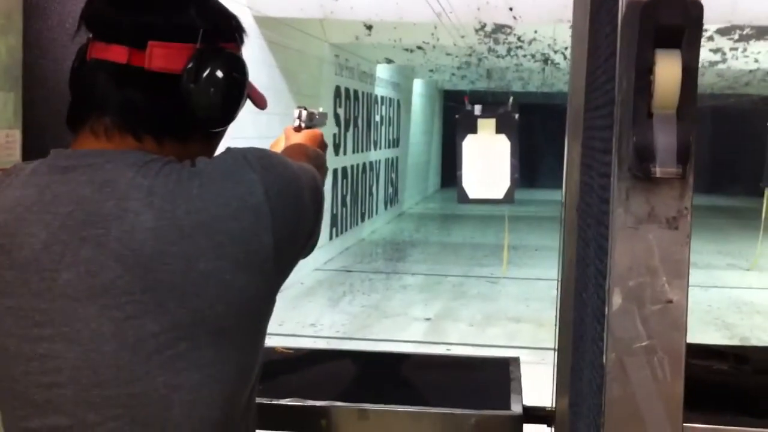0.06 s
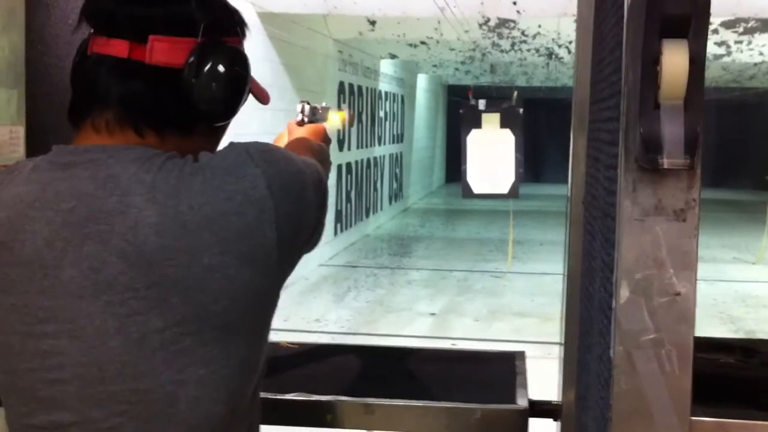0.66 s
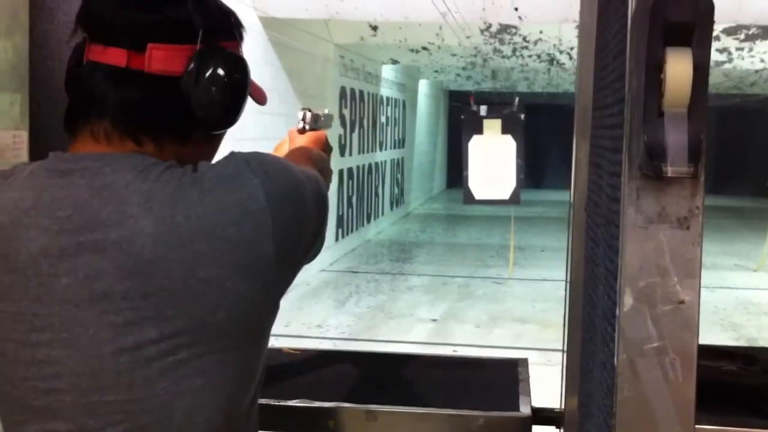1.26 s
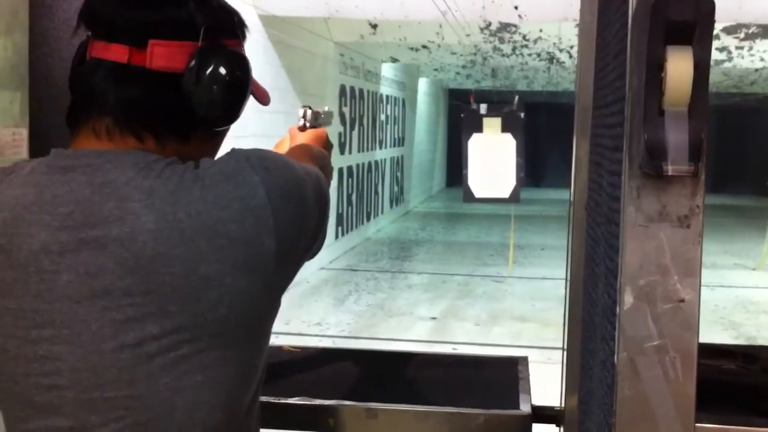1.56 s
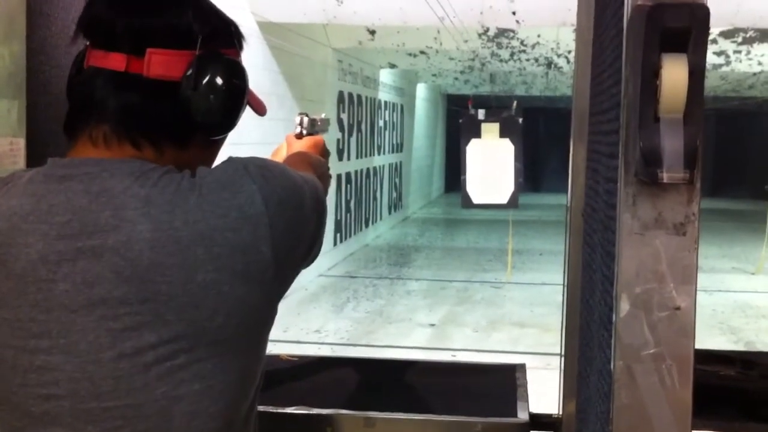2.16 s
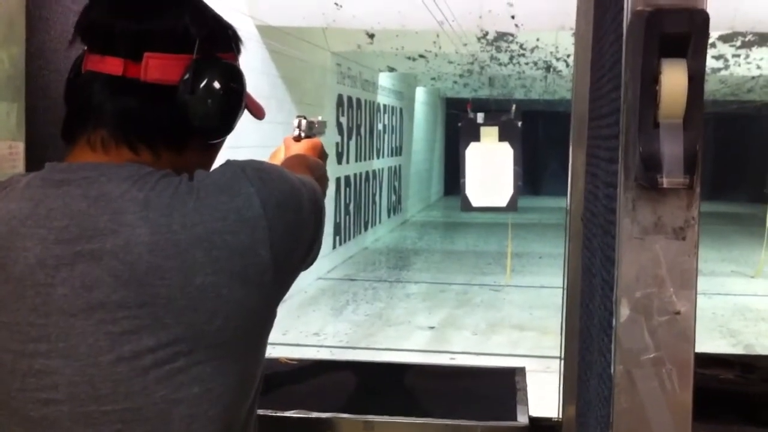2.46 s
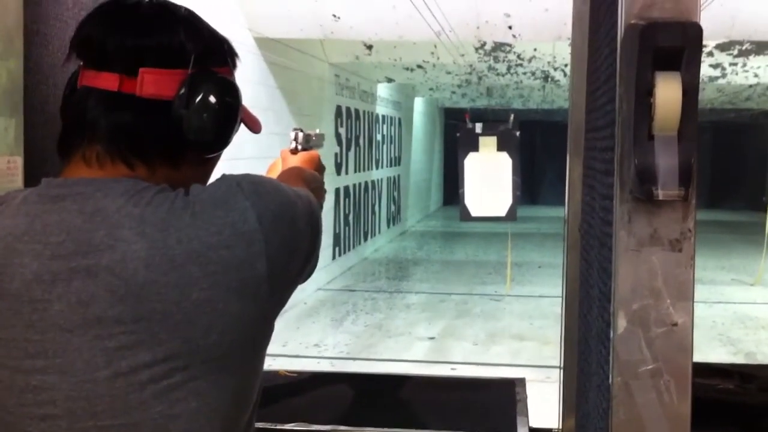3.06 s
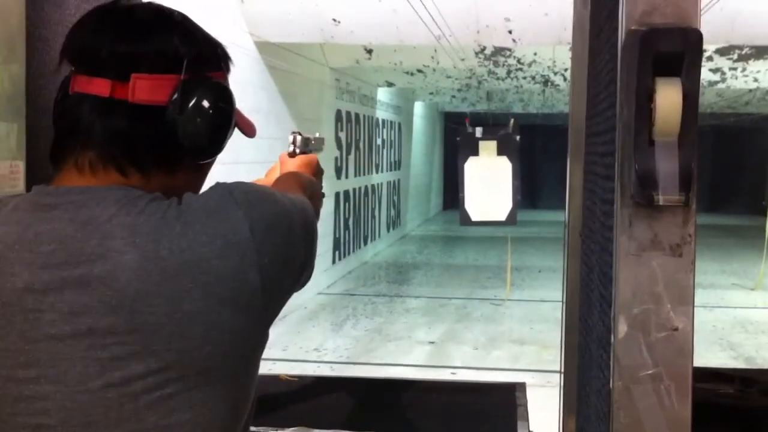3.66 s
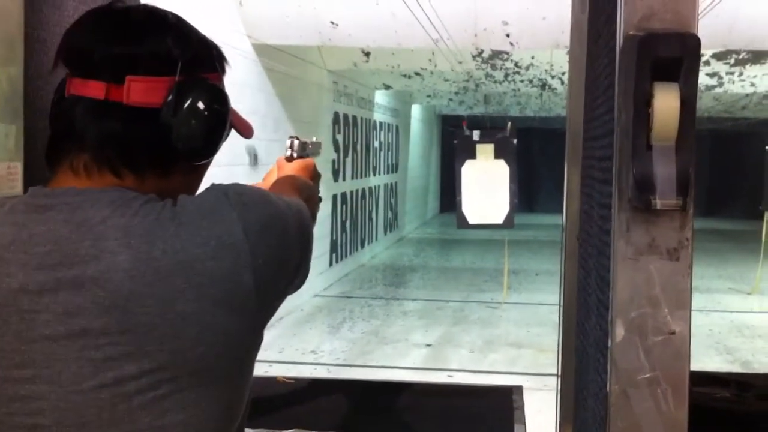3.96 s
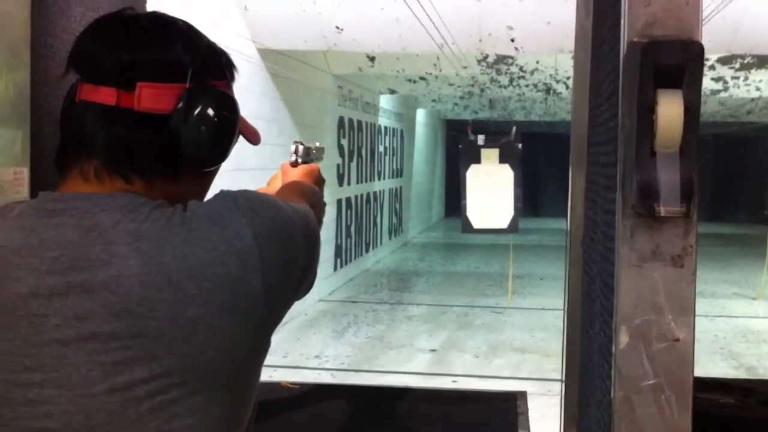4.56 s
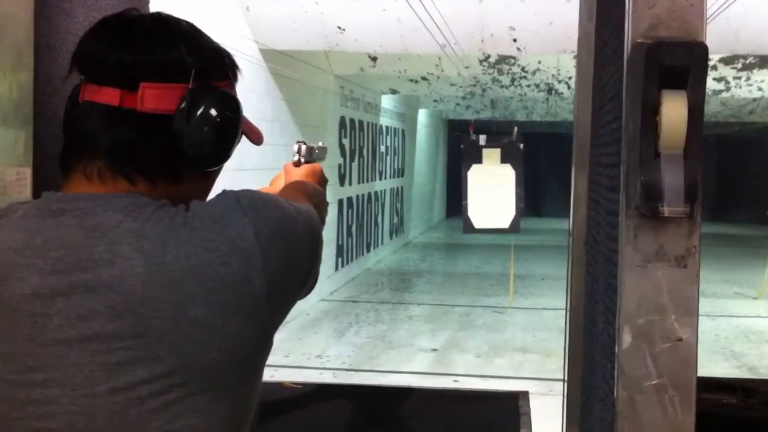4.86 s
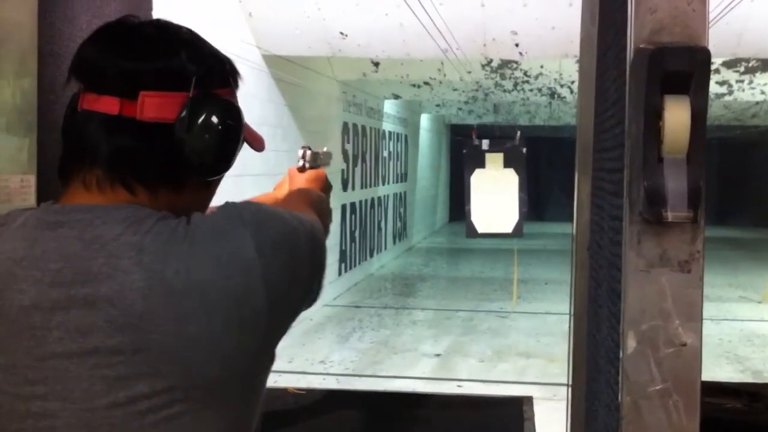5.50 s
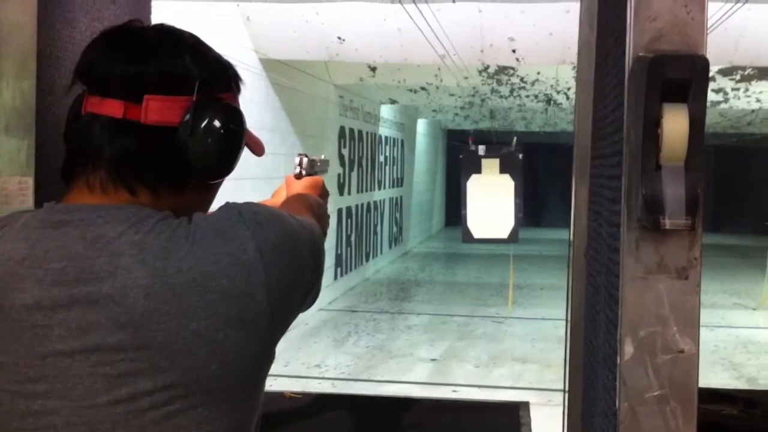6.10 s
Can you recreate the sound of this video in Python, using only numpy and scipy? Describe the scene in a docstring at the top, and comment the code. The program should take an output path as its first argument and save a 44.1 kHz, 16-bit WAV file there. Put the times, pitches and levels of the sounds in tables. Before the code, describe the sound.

Steady ventilation rumble and air hiss fill an indoor shooting range, heard from just behind the booth. At about 0.8 seconds a pistol fires: a sharp crack and boom rattles between the booth walls, slaps back from the far end and rolls on through the concrete hall. A brief, bright rustle comes at about 1.6 seconds, followed by faint, high pings of spent brass and two light ticks up to 3 seconds. Two quick shots land at about 3.4 and 3.6 seconds. A knock follows near 3.9, then a sharp metallic knock with a louder ping at 4.5, and smaller clinks around 5 and 5.3. Two more shots come at about 5.4 and 5.7 seconds, their echo dying away. Each blast overloads the microphone, and the overall level dips and slowly recovers.

```python
"""Five pistol shots in an indoor range, heard from just behind the shooter's booth.
Ventilation runs from start to end. The first shot, at 0.8 s, rattles between the booth walls, comes
back from the far end and rolls on in the concrete hall. A brief rustle and faint pings of spent brass
cases follow. Two quick shots come at about 3.5 s, then louder pings and knocks, and two more shots at
about 5.5 s. Each blast overloads the recorder, which turns itself down and slowly back up."""
import sys
import numpy as np
from scipy import signal
from scipy.fft import rfft, irfft, next_fast_len
from scipy.io import wavfile
from scipy.ndimage import uniform_filter1d

SR = 44100
rng = np.random.default_rng(int(sys.argv[2]) if len(sys.argv) > 2 else 0)


def master_out(mix):
    """Clip the mix to full scale and print it as 16-bit PCM to the path in sys.argv[1]."""
    frames = np.transpose(np.atleast_2d(mix))
    ceiling = np.clip(frames, -1, 1)
    pcm = np.round(ceiling * 32767).astype(np.int16)
    wavfile.write(sys.argv[1], SR, pcm)


N = 279594
TIME = np.arange(N) / SR


def gain_of(db):
    return 10 ** (np.asarray(db) / 20)


def unit_level(x):
    """Scales x to an average power of 1."""
    return x / np.sqrt(np.mean(x ** 2) + 1e-20)


def look_up(table, hz):
    """The value between a table's rows, on a log-frequency axis."""
    f, value = np.transpose(table)
    return np.interp(np.log(hz + 1), np.log(f + 1), value)


def add(mix, start_s, sound):
    """Adds a sound into the mix at its start time."""
    part = mix[round(start_s * SR):][:len(sound)]
    part += sound[:len(part)]


def tint(x, colour):
    """Makes each frequency of x louder or softer by a table of dB."""
    size = next_fast_len(len(x))
    gains = gain_of(look_up(colour, np.fft.rfftfreq(size, 1 / SR)))
    return irfft(rfft(x, size) * gains, size)[:len(x)]


def noise(colour, size):
    """Noise of power 1; the colour says how strong its frequencies are next to each other."""
    return unit_level(tint(rng.standard_normal(size), colour))


def dying(t, t60):
    """A smooth decay; t60 is the time it takes to fall by 60 dB."""
    return np.exp(-np.log(1000) * t / t60)


def fade(x, t60s, build_cycles=1):
    """Each frequency of x takes some cycles to build up, then dies at its own speed."""
    hz, t, spectrum = signal.stft(x, SR, nperseg=512)
    build = 1 - np.exp(-(t + t[1] / 2) * hz[:, None] / build_cycles)
    decay = gain_of(-60 * t / look_up(t60s, hz)[:, None])
    return signal.istft(spectrum * build * decay, SR, nperseg=512)[1][:len(x)]


def ring(tones, t):
    """A struck object rings with a few dying tones, each starting at a random point in its cycle."""
    return sum(gain_of(db) * dying(t, t60) * np.sin(2 * np.pi * (hz * t + rng.random()))
               for hz, db, t60 in tones)


def ventilation(level_db=-39.5):
    """Steady duct rumble and air hiss."""
    # colour of the moving air: f/Hz, level/dB
    air_colour = [(15, -67), (25, -31), (70, -26), (116, -4.5), (157, -2), (352, -8.5), (403, -18),
                  (587, -15.5), (769, -18.5), (981, -18.5), (1430, -21.5), (1640, -21.5), (2520, -23),
                  (3680, -23), (15800, -31.5)]
    return gain_of(level_db) * noise(air_colour, N)


def rustle(rise_s=0.022, t60=0.44):
    """Short, bright brushes of noise that swell quickly, then die away."""
    # one row a brush: t/s, level/dB
    brushes = [(1.603, -29.5), (1.672, -27.5)]
    # colour of a brush: f/Hz, level/dB
    brush_colour = [(100, -45), (800, -17), (3000, -5), (6000, -1), (10000, -5), (15000, -8)]
    t, out = TIME[:SR], np.zeros(N)
    stroke = np.minimum(t / rise_s, dying(t - rise_s, t60))
    for start_s, db in brushes:
        add(out, start_s, gain_of(db) * stroke * noise(brush_colour, SR))
    return out


def brass_pings(tumble=0.4):
    """Spent cases land and ring; they send the sound out unevenly as they tumble."""
    # one row a landing: t/s, level/dB
    landings = [(1.83, -52), (2.08, -54), (2.31, -58.5), (2.585, -55), (4.533, -28), (5.0, -42),
                (5.268, -36), (5.315, -36.5)]
    # tones of a brass case: f/Hz, level/dB, t60/s
    case_tones = [(7810, -3, 0.39), (7920, 1.5, 0.54), (7985, -9, 0.23), (11800, -4.5, 0.29),
                  (12080, -16, 0.16)]
    out = np.zeros(N)
    for start_s, db in landings:
        wobble = 1 + tumble * unit_level(uniform_filter1d(rng.standard_normal(SR), size=350))
        add(out, start_s, gain_of(db) * wobble * ring(case_tones, TIME[:SR]))
    return out


def knocks(click_t60=0.11):
    """Each knock is a click of noise plus the short, deeper ring of a struck brass case."""
    # one row a knock: t/s, click level/dB, ring level/dB
    hits = [(2.782, -43.5, -65), (3.033, -39, -54), (3.945, -12, -41), (4.531, -16, -8), (5.0, -36, -55),
            (5.268, -38, -51.5)]
    # colour of a click: f/Hz, level/dB
    click_colour = [(30, -30), (200, -14), (1500, 2), (5500, 0), (10000, -3), (15000, -4)]
    # tones of a struck case: f/Hz, level/dB, t60/s
    struck_case_tones = [(1800, -4.5, 0.069), (3110, -6.5, 0.046), (4540, -17, .08), (5550, -3.5, 0.051),
                         (7840, -10, 0.044), (9044, -16, 0.11)]
    t, out = TIME[:SR], np.zeros(N)
    for start_s, click_db, ring_db in hits:
        click = gain_of(click_db) * noise(click_colour, SR) * dying(t, click_t60)
        add(out, start_s, click + gain_of(ring_db) * ring(struck_case_tones, t))
    return out


def with_reflections(x, level_db=-8, t60=0.3):
    """The booth adds a short spray of reflections to a small sound."""
    room = rng.standard_normal(SR) * dying(TIME[:SR], t60)
    return x + gain_of(level_db) * signal.fftconvolve(x, room / np.linalg.norm(room))[:N]


def wall_flutter(size):
    """Sound trapped between parallel walls lingers in a nearly even row of pitches."""
    # resonances between the walls: f/Hz, width/Hz, level/dB
    peaks = [(397, 114, -4.5), (592, 55, -3), (767, 116, 0.5), (1120, 134, -3), (1438, 94, -5),
             (1805, 190, -11), (2150, 120, -8.5), (2480, 130, -9), (2840, 140, -15.5), (3600, 560, -18),
             (5000, 1440, -20.5)]
    # how long they linger: f/Hz, t60/s
    flutter_decay = [(380, 2.3), (750, 2.47), (1400, 2.364), (3000, 2.17), (5500, 1.72)]
    hz = np.fft.rfftfreq(size, 1 / SR)
    shape = sum(gain_of(db) * np.exp(-((hz - centre) / width) ** 2) for centre, width, db in peaks)
    trapped = unit_level(irfft(rfft(rng.standard_normal(size)) * shape, size))
    return fade(trapped, flutter_decay)


def hall_roll(hall_noise, hall_db=19, flutter_db=2, swell_s=0.052):
    """A blast swells up in the concrete hall and rolls on, along with the wall flutter."""
    # how long the hall rings: f/Hz, t60/s
    hall_decay = [(120, 0.94), (350, 1.35), (750, 1.343), (1400, 1.49), (2700, 1.35), (5500, 1.172),
                  (9500, 0.8), (14000, 0.34)]
    size = len(hall_noise)
    swell = 1 - np.exp(-TIME[:size] / swell_s)
    tail = gain_of(hall_db) * fade(hall_noise, hall_decay, build_cycles=2.8)
    return swell * (tail + gain_of(flutter_db) * wall_flutter(size))


def far_wall_echo(booth_noise, slap_db=6, slap_t60=0.022, smear_db=13.5, rise_s=0.0047):
    """The straight path to the far wall returns a slap; slanted paths crowd in behind as a smear."""
    # colour of the smear: f/Hz, level/dB
    smear_colour = [(30, -55), (90, -11.5), (200, 6), (700, 2.5), (1200, 2.5), (2000, -4.5), (5000, -4.5),
                    (8000, -12), (15000, -20)]
    # how long it lasts: f/Hz, t60/s
    smear_decay = [(200, 0.34), (800, 0.77), (3000, 0.51), (12000, 0.48)]
    t = TIME[:SR]
    slap = booth_noise * dying(t, slap_t60)
    smear = fade(noise(smear_colour, SR), smear_decay) * (1 - np.exp(-t / rise_s))
    return gain_of(slap_db) * slap + gain_of(smear_db) * smear


def booth_blast(booth_noise, level_db=29):
    """The blast rattles between the booth walls: a thin crack first, then the boom."""
    # how long the booth rings: f/Hz, t60/s
    booth_decay = [(200, 0.43), (1200, 0.25), (5000, 0.27), (15000, 0.17)]
    return gain_of(level_db) * fade(booth_noise, booth_decay, build_cycles=17.5)


def pistol_shots(echo_delay_s=0.139, alike=0.6):
    """Each shot gives a blast in the booth, a long roll in the hall and one echo."""
    # one row a shot: t/s, blast gain/dB, hall gain/dB, echo gain/dB
    shots = [(0.809, 0.5, -1, 2.5), (3.3562, 1, -2, 2.5), (3.617, -3, 0.5, -1.5), (5.3927, 1, -0.5, 2),
             (5.674, -2, 0, -1)]
    # colour of the blast in the booth: f/Hz, level/dB
    booth_colour = [(40, -38), (150, -6.5), (400, -1), (900, 4), (1500, 3.5), (2500, -2), (5000, -2.5),
                    (8000, -5), (12000, -10), (16000, -2.5)]
    # colour of the hall: f/Hz, level/dB
    hall_colour = [(35, -67), (100, -26), (170, 0), (300, 2.5), (520, 2.5), (700, 4), (950, -3), (1200, -3),
                   (1700, -13), (2500, -10), (3600, -15.5), (5500, -16), (9000, -17), (15000, -8)]
    hall_size, out = 3 * SR, np.zeros(N)
    # the same walls answer every shot in nearly the same way, so the shots share part of their noise
    booth_walls, hall_walls = noise(booth_colour, SR), noise(hall_colour, hall_size)
    shared, fresh = np.sqrt(alike), np.sqrt(1 - alike)
    for start_s, blast_db, hall_db, echo_db in shots:
        booth_noise = shared * booth_walls + fresh * noise(booth_colour, SR)
        hall_noise = shared * hall_walls + fresh * noise(hall_colour, hall_size)
        add(out, start_s, gain_of(blast_db) * booth_blast(booth_noise))
        add(out, start_s, gain_of(hall_db) * hall_roll(hall_noise))
        add(out, start_s + echo_delay_s, gain_of(echo_db) * far_wall_echo(booth_noise))
    return out


def scene():
    """All the sounds of the range in one channel."""
    return (pistol_shots() + with_reflections(brass_pings() + knocks()) + rustle() + ventilation())[None]


def duck(x, threshold_db=-9, max_cut_db=20, attack_s=0.0016, release_s=0.66):
    """Automatic volume control: turns loud sound down quickly, then creeps back up."""
    power = signal.lfilter(np.ones(128) / 128, [1], x ** 2)
    over_db = np.clip(10 * np.log10(power + 1e-12) - threshold_db, 0, max_cut_db)
    recovery = np.exp(-TIME / release_s)
    held_db = np.maximum.accumulate(over_db / recovery) * recovery
    smoothing = np.exp(-1 / (attack_s * SR))
    cut_db = signal.lfilter([1 - smoothing], [1, -smoothing], held_db)
    return x / gain_of(cut_db)


def record(dry, ceiling=0.64, hardness=6, lopsided=0.026, bottom_hz=18, top_hz=15880):
    """The recorder ducks but still overloads, then colours the sound and trims its lows and highs."""
    # the recorder's colour: f/Hz, gain/dB
    mic_colour = [(10, 2), (30, -8.5), (150, 0), (1000, -0.5), (5000, -1.5), (10000, -3), (16000, -6.5)]
    x = duck(dry[0])
    limit = ceiling * (1 + lopsided * np.sign(x))  # one side of the wave clips a little sooner
    clipped = x / (1 + abs(x / limit) ** hardness) ** (1 / hardness)
    centred = signal.sosfilt(signal.butter(1, bottom_hz, "high", fs=SR, output="sos"), clipped)
    low_pass = signal.firwin(511, top_hz, window=("kaiser", 9), fs=SR)
    return signal.oaconvolve(tint(centred, mic_colour), low_pass, "same")[None]


dry = scene()
out = record(dry)
master_out(out)
```